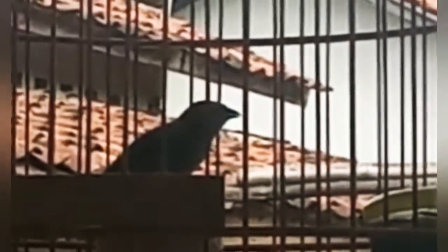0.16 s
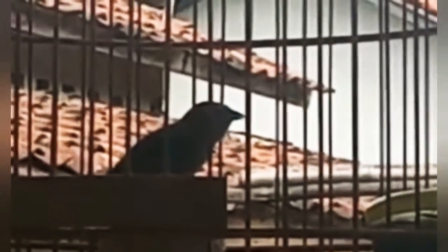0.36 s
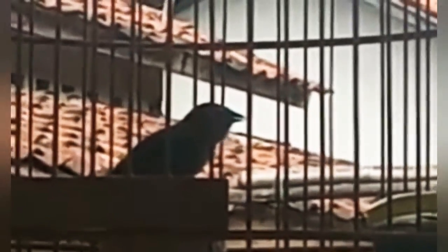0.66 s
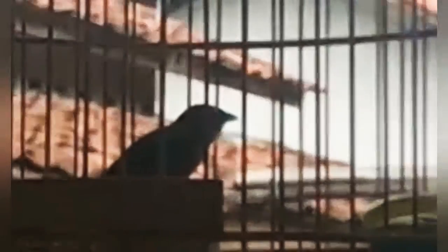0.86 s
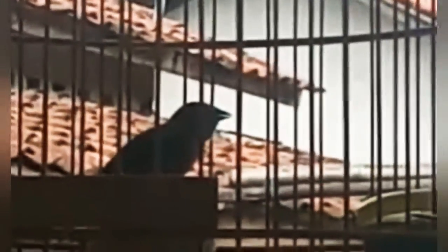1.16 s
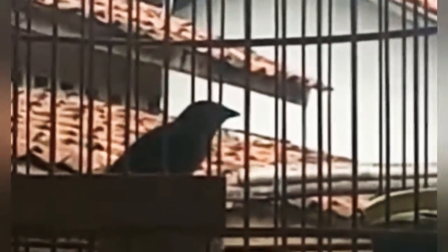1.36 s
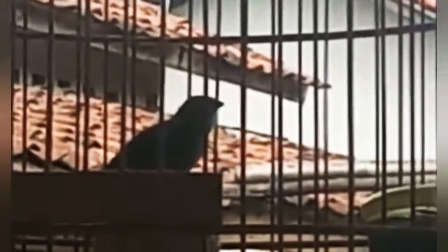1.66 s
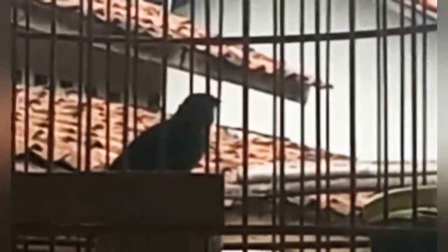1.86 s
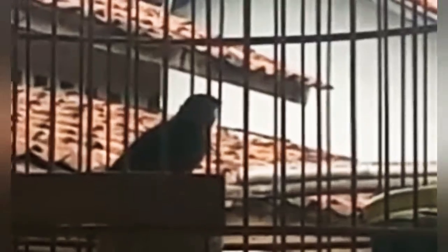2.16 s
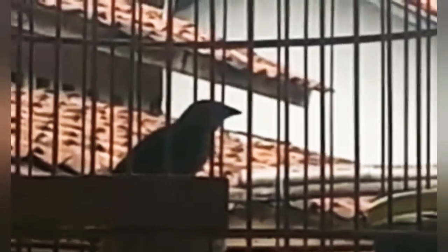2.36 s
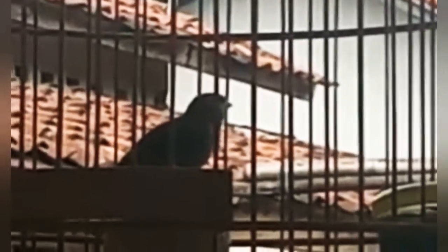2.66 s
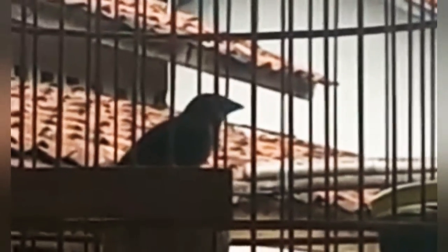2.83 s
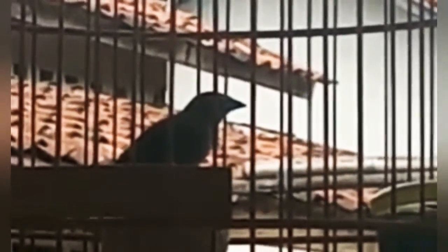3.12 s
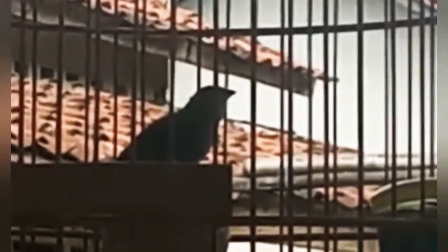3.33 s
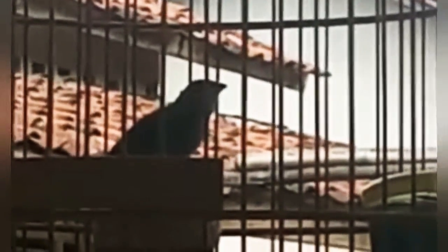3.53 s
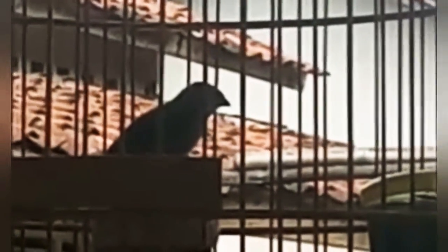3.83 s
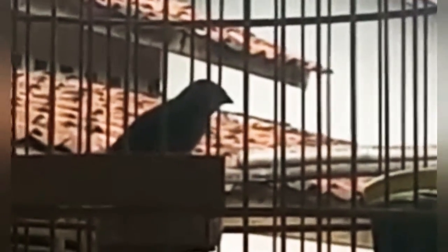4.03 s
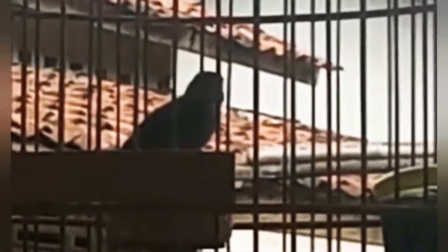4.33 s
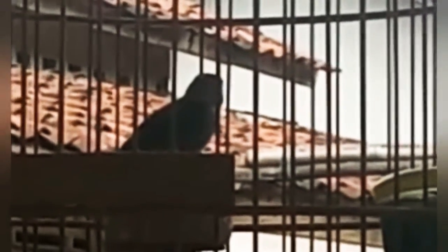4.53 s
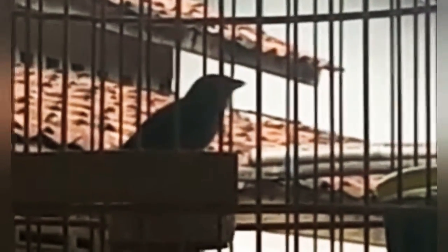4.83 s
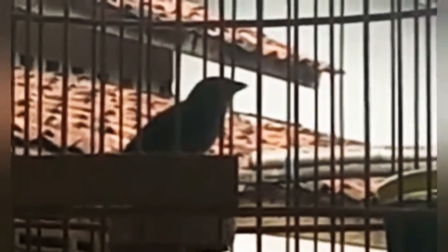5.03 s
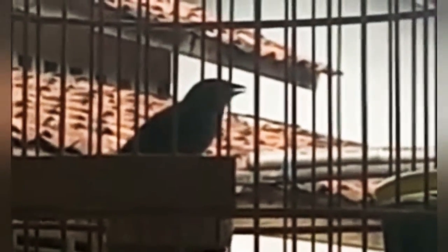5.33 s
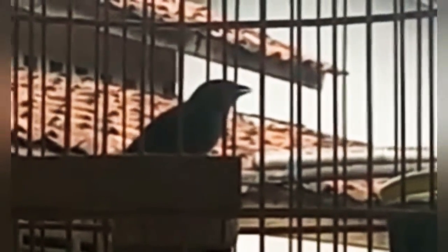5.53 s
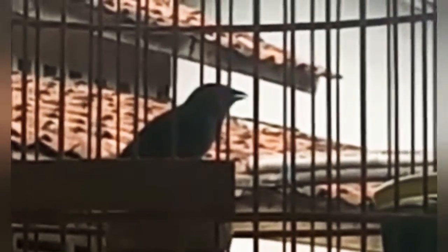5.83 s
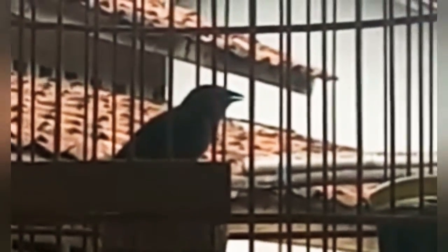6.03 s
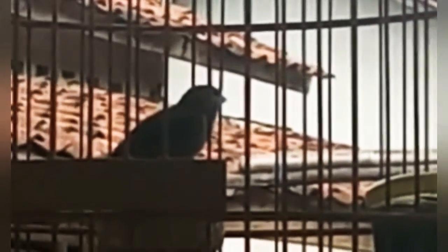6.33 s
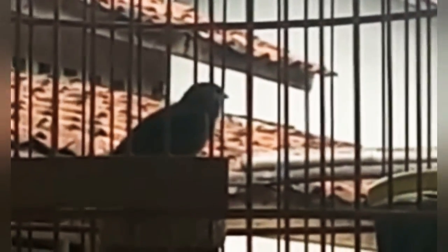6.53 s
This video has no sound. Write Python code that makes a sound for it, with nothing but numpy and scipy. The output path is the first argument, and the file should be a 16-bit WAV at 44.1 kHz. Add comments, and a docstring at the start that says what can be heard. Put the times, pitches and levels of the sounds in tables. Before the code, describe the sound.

A small caged bird opens with clear falling whistles as one dove gives stuttering hoots and a lower dove coos into a rolling purr. Quick creaky flicks, a short warble and sparse taps follow. The hoots return near the middle, then the low coo, and the songbird ends in rapid rising chirps and sharp buzzes. Echoing outdoor yard, close bird, faint traffic rumble.

```python
"""Falling slurs of a caged songbird, a dove's stuttering hoots and a lower dove's coo start at once.
The songbird goes on in a tiled yard: swept tones make its whistles, warble, flicks and buzzes.
The doves are nearly pure tones with breath noise; the lower one ends in a beating roll.
Faint birds and cries (soft tones), cage taps and scuffs (noise bursts) lie around them.
Random echoes stand for the walls, coloured noise for distant traffic and air."""
import sys
import numpy as np
from scipy import signal
from scipy.fft import rfft, irfft, next_fast_len
from scipy.io import wavfile
from scipy.ndimage import uniform_filter1d, map_coordinates

SR = 44100
rng = np.random.default_rng(int(sys.argv[2]) if len(sys.argv) > 2 else 0)


def transcribe(u):
    """Save the signal u as a 16-bit wav file named by the first command-line argument.

    u: samples, shape (n,) or (channels, n), limited to [-1, 1]; the rate is SR.
    q: integer samples, one column per channel.
    """
    v = np.clip(np.atleast_2d(u).T, -1, 1)
    q = np.round(v * 32767).astype(np.int16)
    wavfile.write(sys.argv[1], SR, q)


N = 294588


def amp(db):
    """Decibels to gain."""
    return 10 ** (np.asarray(db) / 20)


def unit(x):
    """Scale to rms 1."""
    return x / np.sqrt(np.mean(x ** 2) + 1e-20)


def seconds(length_s):
    """Time axis of one sound, in s."""
    return np.arange(int(length_s * SR)) / SR


def along(points, hz):
    """(f/Hz, value) points interpolated on a log frequency axis."""
    f, v = np.transpose(points)
    return np.interp(np.log(hz + 1), np.log(f + 1), v)


def wobble(rate_hz, size):
    """Smooth random curve with rate_hz knots per second."""
    knots = rng.standard_normal(int(size * rate_hz / SR) + 4)
    return map_coordinates(knots, [np.arange(size) * rate_hz / SR])


def filtered(x, response):
    """Apply a zero-phase gain response(f/Hz) to x."""
    m = next_fast_len(N + SR // 2)
    return irfft(rfft(x, m) * response(np.fft.rfftfreq(m, 1 / SR)), m)[:N]


def coloured(x, colour):
    """Filter x by (f/Hz, level/dB) points."""
    return filtered(x, lambda hz: amp(along(colour, hz)))


def noise(spectrum):
    """Coloured noise of rms 1."""
    return unit(coloured(rng.standard_normal(N), spectrum))


def patches(shape):
    """Smooth random field of rms 1 over frequency and time."""
    field = uniform_filter1d(rng.standard_normal(shape), size=3, axis=0)
    return unit(uniform_filter1d(field, size=6, axis=1))


def rasp(size, centre_hz, octaves):
    """Short band of noise of rms 1, Gaussian in log frequency."""
    hz = np.fft.rfftfreq(size, 1 / SR)
    band = np.exp(-(np.log2((hz + 1) / centre_hz) / octaves) ** 2)
    return unit(irfft(rfft(rng.standard_normal(size)) * band, size))


def add(track, s, sound):
    """Mix a sound into the track at s seconds; clip it to the track."""
    start = round(s * SR)
    part = sound[max(-start, 0):max(N - start, 0)]
    track[max(start, 0):][:len(part)] += part


def fade(t, attack, release):
    """Sine-squared opening and closing of a note; times in s."""
    return np.sin(np.pi / 2 * np.clip(np.minimum(t / attack, (t[-1] - t) / release), 0, 1)) ** 2


def gesture(length, start_hz, middle_hz, end_hz, db, place=.5, *, fade_db, edge):
    """Time/s, pitch/Hz and gain of a note: parabolic pitch, level peaking at place (0-1)."""
    t = seconds(length)
    u = t / length
    hz = np.polyval(np.polyfit([0, .5, 1], [start_hz, middle_hz, end_hz], 2), u)
    swell = amp(db - fade_db * np.abs(u - place) / max(place, 1 - place))
    gate = np.sin(np.pi / 2 * np.clip(np.minimum(t, length - t) / edge, 0, 1)) ** 2
    return t, hz, swell * gate


def voice(hz, gain, parts, jitter, jitter_rate):
    """Tone of (pitch multiple, level/dB) partials whose pitch and strength waver."""
    hz = hz * (1 + jitter * wobble(jitter_rate, len(hz)))
    gain = gain * amp(1.7 * wobble(jitter_rate / 2, len(hz)))
    phase = 2 * np.pi * np.cumsum(hz) / SR
    tone = sum(amp(db) * np.sin(k * phase) * (k * hz < SR / 2) for k, db in parts)
    return np.sqrt(2) * gain * tone


def phrase(notes, parts, fade_db, edge, jitter, jitter_rate):
    """Rows of (t/s, gesture columns) sung in one voice."""
    out = np.zeros(N)
    for s, *note in notes:
        t, hz, gain = gesture(*note, fade_db=fade_db, edge=edge)
        add(out, s, voice(hz, gain, parts, jitter, jitter_rate))
    return out


# distant traffic level: (t/s, level/dB)
TRAFFIC_LEVEL = [(0.0, -61.5), (0.4, -53.5), (0.65, -58), (1.41, -55), (1.86, -61), (3.42, -52), (4.3, -56),
                 (5.34, -51.5), (5.78, -58), (6.68, -56)]
# traffic spectrum shape: (f/Hz, relative level per Hz/dB)
RUMBLE_SPECTRUM = [(25, -29.5), (70, -3), (100, -4.5), (135, 2.5), (190, -13.5), (245, -26), (325, -9),
                   (410, -25), (480, -43), (700, -45), (2500, -67.5)]


def traffic():
    """Low noise, uneven over time and frequency, that swells and sinks."""
    z = signal.stft(noise(RUMBLE_SPECTRUM), nperseg=4096)[2]
    uneven = unit(signal.istft(z * amp(2.8 * patches(z.shape)))[1][:N])
    level_db = np.interp(np.arange(N) / SR, *np.transpose(TRAFFIC_LEVEL))
    return amp(level_db + 2.1 * wobble(9, N)) * uneven


def engine():
    """One brief low drone: a wavering sine."""
    note = (5.05, 0.718, 82.222, 84.28, 83.594, -47.983)  # t/s, length/s, three f/Hz, level/dB
    return phrase([note], [(1, 0)], fade_db=10, edge=0.092, jitter=0.019, jitter_rate=17)


# air hiss spectrum shape: (f/Hz, relative level per Hz/dB)
AIR_SPECTRUM = [(1400, 0.5), (1650, 4.5), (1900, -7), (4000, -5), (7500, -13), (10500, -10), (15500, -19.5)]


def air():
    """Faint steady coloured noise."""
    return amp(-81.5) * noise(AIR_SPECTRUM)


# yard decay: (f/Hz, t60/s)
YARD_T60 = [(1000, 0.51), (5000, 0.38), (12000, 0.22)]


def yard(x, wet_db, near_db):
    """Add early echoes off near walls and an uneven decaying tail, gained by energy."""
    hz, t, z = signal.stft(rng.standard_normal(SR), SR, nperseg=256)
    decay_db = -60 * t / along(YARD_T60, hz)[:, None]
    tail = signal.istft(z * amp(3.75 * patches(z.shape) + decay_db), SR, nperseg=256)[1]
    t = np.arange(len(tail)) / SR
    tail = tail * (1 - np.exp(-t / 0.01))
    hits = rng.random(len(t)) < 500 / SR  # 500 echoes per s on average
    walls = rng.standard_normal(len(t)) * hits * amp(-60 * t / 0.13)
    tail = amp(wet_db) * tail / np.linalg.norm(tail)
    walls = amp(near_db) * walls / np.linalg.norm(walls)
    return x + signal.fftconvolve(x, tail + walls)[:N]


# faint distant cries: (t/s, length/s, start, middle, end f/Hz before the 0.99 multiple, level/dB)
CRY_NOTES = [(1.97, .33, 222, 230, 198, -59.5), (1.95, .2, 1100, 930, 1000, -69.5),
             (1.15, 0.307, 700, 815, 720, -69)]


def cries():
    """Faint bending tones, a single partial each."""
    return phrase(CRY_NOTES, [(0.99, 0)], fade_db=7, edge=0.013, jitter=0.037, jitter_rate=120)


# one nasal peep: t/s, length/s, start, middle, end f/Hz, level/dB of an overtone at 0 dB
PEEP = (2.318, 0.17, 540, 562.5, 544, -58)
# peep overtone levels: (f/Hz, level/dB)
PEEP_COLOUR = [(550, 2), (1500, -19), (2300, -17), (6500, -17.5)]


def nasal_peep():
    """One note with 12 harmonics, strongest at the lowest."""
    parts = [(k, along(PEEP_COLOUR, k * PEEP[2])) for k in np.arange(1, 13)]
    return phrase([PEEP], parts, fade_db=6, edge=0.022, jitter=.026, jitter_rate=250)


def chatter(count=170):
    """Notes of faint short chips, random in time, pitch, bend and level."""
    chips = []
    for when, pitch, bend, level in rng.random((count, 4)):
        hz = 1900 * 3.2 ** pitch
        end_hz = hz * (0.79 + .25 * bend)
        chips.append((when * N / SR, .035, hz, hz, end_hz, -79.5 + 8 * level))
    return chips


# repeats of a farther bird's falling whistle: (t/s, level/dB)
FALLING_STARTS = [(.05, -61.5), (.94, -65), (2.97, -63), (4.089, -66)]
# that whistle: length/s, start, middle, end f/Hz before the 0.99 multiple
FALLING_SHAPE = (0.19, 4950, 4480, 3950)
# thin level whistles: (t/s, length/s, f/Hz before the 0.99 multiple, level/dB)
THIN_NOTES = [(0, 0.32, 6250, -69), (2.699, 0.11, 5840, -64), (3.021, 0.15, 6260, -69.5)]


def far_birds():
    """Falling whistles, thin level ones and stray chips, all single wavering partials."""
    falling = [(s, *FALLING_SHAPE, db) for s, db in FALLING_STARTS]
    thin = [(s, length, hz, hz, hz, db) for s, length, hz, db in THIN_NOTES]
    notes = falling + thin + chatter()
    return phrase(notes, [(0.99, 0.0014)], fade_db=7, edge=0.014, jitter=.016, jitter_rate=260)


# soft scuffs in the yard: (t/s, length/s, centre f/Hz, level/dB)
SCUFF_EVENTS = [(1.706, 0.067, 810, -68.5), (2.433, 0.095, 640, -64), (5.599, 0.13, 774, -60.5),
                (6.121, 0.059, 735, -68.5), (6.267, 0.055, 414, -67)]


def scuffs():
    """Soft puffs of dull band noise."""
    out = np.zeros(N)
    for s, length, centre_hz, db in SCUFF_EVENTS:
        size = int(length * SR)
        add(out, s, amp(db) * np.hanning(size) * rasp(size, centre_hz, octaves=0.86))
    return out


# taps of beak and feet on the cage: (t/s, ring level/dB, crack level/dB)
TAP_EVENTS = [(0.363, -77, -68), (.775, -78, -65), (1.252, -58.5, -56), (1.542, -48.5, -62.5),
              (1.993, -74, -47.5), (2.234, -65.5, -64.5), (3.639, -66, -63), (5.229, -61.5, -54.5),
              (6.276, -57, -58.5)]
# cage modes: (f/Hz, mean relative level/dB, t60/s)
CAGE_MODES = [(1273, -5, 0.044), (3210, -2.5, 0.087), (4104, -1.5, 0.043), (6060, -9, 0.079)]


def taps():
    """Short gritty scrapes that ring the decaying modes of the cage."""
    out, t = np.zeros(N), np.arange(SR // 4) / SR
    for s, ring_db, crack_db in TAP_EVENTS:
        ring = np.zeros(len(t))
        for hz, level_db, t60 in CAGE_MODES:
            mode_db = level_db + rng.normal(0, 2) - 60 * t / t60
            ring += amp(mode_db) * np.sin(2 * np.pi * hz * t)
        grit = unit(rasp(len(t), 8000, octaves=0.71) * amp(7.4 * wobble(1500, len(t))))
        crack = amp(-60 * t / 0.089) * grit
        onset = 1 - np.exp(-t / 0.00086)
        add(out, s, (amp(ring_db) * ring + amp(crack_db) * crack) * onset)
    return out


# phrase starts: t/s
HOOT_PHRASE_STARTS = [-.251, 2.672]
# arched hoots: (t in phrase/s, length/s, top f/Hz before the 0.99 multiple, level/dB, swoop time/s)
HOOTS = [(0, .165, 1212, -42, .021), (0.165, .045, 1093, -39.5, .005), (0.251, 0.044, 1064, -40, .007),
         (0.347, .054, 1073, -40.5, 0.0091), (0.462, .114, 1109, -43.5, 0.0117)]
# throat colour: (f/Hz, level/dB)
HIGH_THROAT = [(1170, 0.5), (1290, -14.5), (2000, -24.5)]
HOOT_SCOOP, HOOT_SAG = .33, .12  # shares of top pitch: low start, drop at end


def high_dove():
    """One phrase twice: sines swoop up, sag at the end and carry breath noise."""
    out = np.zeros(N)
    for s in HOOT_PHRASE_STARTS:
        for after, length, top_hz, db, swoop_s in HOOTS:
            t = seconds(length)
            scoop = HOOT_SCOOP * np.exp(-t / swoop_s)
            sag = HOOT_SAG * (t / length) ** 3.5
            gain = amp(db) * fade(t, attack=0.0048, release=.008)
            tone = voice(top_hz * (1 - scoop - sag), gain, [(0.99, 0)], jitter=.018, jitter_rate=197.7)
            breath = amp(-14) * gain * rasp(len(t), 902, octaves=0.29)
            add(out, s + after, tone + breath)
    return coloured(out, HIGH_THROAT)


ROLL_AFTER_S = .333
ROLL = (0.4833, 715.5, 659.5, 461.5, -34)  # length/s, start, middle, end f/Hz, level/dB
ROLL_RATE_HZ, ROLL_QUICKENS_HZ_PER_S = 24, 96.2
ROLL_SMOOTH_S, ROLL_MERGE_S = 0.3, .12  # beats merged by, duration of merging
ROLL_HOLD_S, ROLL_RELEASE_DB_PER_S = .35, 79


def roll(parts):
    """Long falling coo: the throat closes between beats, which quicken and merge."""
    t, hz, gain = gesture(*ROLL, place=0.12, fade_db=17, edge=0.0041)
    gain = gain * amp(-ROLL_RELEASE_DB_PER_S * np.maximum(t - ROLL_HOLD_S, 0))
    beat = 2 * np.pi * (ROLL_RATE_HZ * t + ROLL_QUICKENS_HZ_PER_S * t ** 2 / 2)
    depth = np.clip((ROLL_SMOOTH_S - t) / ROLL_MERGE_S, 0, 1)
    closing = depth * (1 + np.cos(beat)) / 2
    gain = gain * amp(-23 * closing ** 1.65)
    sagging_hz = hz * (1 - 0.066 * closing)
    tone = voice(sagging_hz, gain, parts, jitter=0.03, jitter_rate=180)
    return tone + amp(-15.5) * gain * rasp(len(t), 696, octaves=.5)


# calls: (t/s, level offset/dB)
LOW_CALLS = [(.03, -0.5), (4.422, -0.5)]
# rising coo, accent, pickup: (t in call/s, length/s, start f/Hz, end f/Hz, level/dB before call offset)
CALL_NOTES = [(0, 0.082, 528, 633, -41.5), (.069, 0.051, 698, 710, -33.5), (0.295, .04, 591, 638, -44)]
# one extra coo: t/s, length/s, start, middle, end f/Hz, level/dB
EXTRA_COO = (4.5, 0.1839, 540, 556, 538, -47)
# throat colour: (f/Hz, level/dB)
LOW_THROAT = [(750, 0), (1120, 3.5), (1260, -7), (2200, -12)]
COO_HUSK_DB = -65.5


def low_dove():
    """One call twice, husky coos then the roll; the second holds an extra coo."""
    parts = [(1, 0), (2, -24.5)]
    notes = []
    for s, call_db in LOW_CALLS:
        for after, length, low, high, db in CALL_NOTES:
            notes.append((s + after, length, low, (low + high) / 2, high, db + call_db, .6))
    notes.append(EXTRA_COO)
    out = phrase(notes, parts, fade_db=9, edge=0.0066, jitter=0.036, jitter_rate=200)
    for s, length, *_ in notes:
        t = seconds(length)
        husk = fade(t, attack=0.011, release=.03) * rasp(len(t), 850, octaves=.5)
        add(out, s, amp(COO_HUSK_DB) * husk)
    for s, call_db in LOW_CALLS:
        add(out, s + ROLL_AFTER_S, amp(call_db) * roll(parts))
    return coloured(out, LOW_THROAT)


# falling slurs: (t/s, length/s, top f/Hz, end f/Hz, share held at top 0-1, level/dB)
SLUR_NOTES = [(.008, 0.063, 3380, 2645, 0.54, -46), (0.24, 0.12, 3668, 1950, 0.03, -43.5),
              (0.417, 0.1, 3733, 1904, 0.3, -45), (.613, 0.088, 3394, 1925, 0.08, -44.5),
              (0.782, 0.083, 3700, 2100, 0.1, -44), (2.632, .022, 5010, 3900, 0.16, -56.5),
              (2.65, 0.057, 3950, 3080, 0.07, -50), (4.248, 0.05, 4600, 3990, 0.24, -45),
              (4.313, 0.038, 4040, 2823, 0, -46.5), (4.42, 0.05, 4060, 3070, 0.3, -48),
              (4.647, 0.033, 7090, 5290, 0, -40), (4.682, 0.031, 5940, 4460, 0.04, -44),
              (5.748, 0.011, 6780, 6400, 0, -43), (6.083, .024, 6460, 5840, 0.07, -39.5)]
SLUR_ATTACK_SHARE, SLUR_FADE_DB_PER_OCTAVE = 0.18, 16


def slurs(parts):
    """Tones swell from the top pitch, slide down at even speed and weaken with pitch."""
    out = np.zeros(N)
    for s, length, top_hz, end_hz, held, db in SLUR_NOTES:
        t = seconds(length)
        hz = np.interp(t, [held * length, length], [top_hz, end_hz])
        gain = amp(db - SLUR_FADE_DB_PER_OCTAVE * np.log2(top_hz / hz))
        gain = gain * fade(t, SLUR_ATTACK_SHARE * length, release=0.003)
        add(out, s, voice(hz, gain, parts, jitter=0.019, jitter_rate=600))
    return out


# rising whistles: (t/s, length/s, start f/Hz, end f/Hz, upward bow/Hz, level/dB)
RISE_NOTES = [(4.943, 0.032, 2610, 3870, 47, -46.5), (5.147, .1, 2796, 3603, 216, -47),
              (5.392, 0.054, 3010, 3780, -100, -46.5), (5.641, 0.033, 2870, 4890, -300, -43.5),
              (5.819, 0.043, 2780, 4120, -170, -47.5), (5.946, 0.037, 3136, 3570, 155, -42),
              (6.139, 0.022, 3050, 3560, 64, -44), (6.3, 0.021, 3600, 4210, -65, -46.5),
              (6.424, 0.021, 3100, 3885, 217, -43)]
RISE_PEAK, RISE_FADE_DB = 0.71, 13  # place of peak 0-1, drop towards the farther end
RUN_S, RUN_STEP_S, RUN_NOTE_S, RUN_DB = 4.789, .0505, .036, -46.5
RUN_START_HZ, RUN_END_HZ = 2780, 3370


def rises(parts, count=3):
    """Upward glides: a quick even run into a steep one, then singles between buzzes."""
    run = [(RUN_S + k * RUN_STEP_S, RUN_NOTE_S, RUN_START_HZ, RUN_END_HZ, 0, RUN_DB) for k in range(count)]
    notes = []
    for s, length, low, high, bow, db in run + RISE_NOTES:
        notes.append((s, length, low, (low + high) / 2 + bow, high, db, RISE_PEAK))
    return phrase(notes, parts, fade_db=RISE_FADE_DB, edge=0.0017, jitter=0.016, jitter_rate=700)


# one warble: (t/s, trough f/Hz, level/dB)
WARBLE_PATH = [(3.476, 3955, -47.5), (3.515, 3974, -54.5), (3.575, 2717, -55), (3.72, 2665, -57.5)]
WARBLE_CREST_S, WARBLE_RATE_HZ, WARBLE_LEAP_HZ = 3.483, 22.8, 1050  # first crest, crest rate, height


def warble(parts):
    """Sinking tone whose pitch leaps up in narrow, even crests."""
    times, trough_hz, db = np.transpose(WARBLE_PATH)
    t = seconds(times[-1] - times[0])
    s = times[0] + t
    crest = np.cos(np.pi * WARBLE_RATE_HZ * (s - WARBLE_CREST_S)) ** 4
    hz = np.interp(s, times, trough_hz) + WARBLE_LEAP_HZ * crest
    gain = amp(np.interp(s, times, db)) * fade(t, 0.0035, .006)
    out = np.zeros(N)
    add(out, times[0], voice(hz, gain, parts, jitter=0.019, jitter_rate=730))
    return out


# upward flicks: (centre t/s, top f/Hz, level/dB, creak level/dB)
FLICK_NOTES = [(1.078, 3615, -50.5, -53.5), (1.13, 3794, -48, -51.5), (1.182, 4510, -50.5, -48.5),
               (1.237, 3590, -48.5, -58), (1.619, 3600, -62, -58), (1.669, 4070, -54, -56.5),
               (2.629, 5100, -54.5, -59.5), (2.809, 3777, -49, -55.5), (4.254, 4540, -57.5, -64),
               (4.424, 4630, -55, -54.5), (6.658, 3500, -58, -57)]


def flicks(parts):
    """Tones shoot up and round off at the top, each inside a grainy noise creak."""
    out = np.zeros(N)
    for s, top_hz, db, creak_db in FLICK_NOTES:
        t, hz, gain = gesture(0.02, 0.49 * top_hz, .9 * top_hz, top_hz, db, fade_db=12.5, edge=0.0027)
        add(out, s - t[-1] / 2, voice(hz, gain, parts, jitter=0.03, jitter_rate=750))
        size = int(0.052 * SR)
        creak = unit(rasp(size, 2955, octaves=0.52) * amp(3.8 * wobble(400, size)))
        add(out, s - size / SR / 2, amp(creak_db) * np.hanning(size) * creak)
    return out


# buzzes: (t/s, length/s, start f/Hz, end f/Hz, level/dB, sweep rate/Hz, sweep span/Hz: + up, - down)
BUZZ_NOTES = [(1.99, .03, 5900, 4640, -39.5, 289, -2200), (5.079, 0.029, 5600, 4860, -44, 165, 2602),
              (5.103, .024, 5800, 6080, -40.5, 169, 1510), (5.221, .028, 6200, 4810, -41.5, 227, -2400),
              (5.32, .055, 5700, 6250, -38, 135, 2200), (5.57, 0.039, 5800, 5450, -44, 162, 1998),
              (5.756, .026, 6400, 5760, -34, 213, -1200), (6.102, .03, 5850, 5460, -39.5, 229, -1600),
              (6.237, 0.059, 5700, 5700, -43, 140.6, -2600), (6.386, 0.02, 6400, 4730, -40.5, 192, -2000)]
BUZZ_HISS_DB = -29.5  # re tone level
BUZZ_PEAK, BUZZ_UNEVEN_CYCLES = 0.48, .16  # place of peak 0-1, sweep scatter


def buzzes(parts):
    """Uneven trains of tiny whistles sweeping one way, each in a soft puff of hiss."""
    out = np.zeros(N)
    for s, length, start_hz, end_hz, db, rate, sweep_hz in BUZZ_NOTES:
        middle_hz = (start_hz + end_hz) / 2
        t, hz, gain = gesture(length, start_hz, middle_hz, end_hz, db, BUZZ_PEAK, fade_db=5.5, edge=0.0012)
        cycle = (rate * t + BUZZ_UNEVEN_CYCLES * wobble(rate, len(t))) % 1
        swept_hz = hz + sweep_hz * (cycle - .5)
        pulsed = gain * np.abs(np.sin(np.pi * cycle))
        add(out, s, voice(swept_hz, pulsed, parts, jitter=0.024, jitter_rate=1300))
        size = 2 * len(t)
        hiss = np.hanning(size) * rasp(size, 11000, octaves=.6)
        add(out, s - length / 2, amp(db + BUZZ_HISS_DB) * hiss)
    return out


# near bird's colour: (f/Hz, level/dB)
BEAK_COLOUR = [(1950, -0.5), (2450, -9), (3300, 0.5), (6400, 0), (7600, -3.5), (9000, 2), (11700, -2.5),
               (12800, -16.5)]


def songbird():
    """Nearly pure tones with weak harmonics, all filtered by one beak."""
    parts = [(1, 0), (2, -27.5), (3, -38.5)]
    song = slurs(parts) + rises(parts) + warble(parts) + flicks(parts) + buzzes(parts)
    return coloured(song, BEAK_COLOUR)


def scene():
    """Mix: near bird drier, far ones with more echo than direct sound."""
    background = traffic() + engine() + air()
    distant = amp(-3.0) * yard(far_birds() + cries() + nasal_peep(), wet_db=-1.9, near_db=-3.0)
    high = amp(-2.0) * yard(high_dove(), wet_db=-8.0, near_db=-5)
    low = amp(-0.54) * yard(low_dove(), wet_db=-11.0, near_db=-12)
    near = amp(-1.5) * yard(songbird() + taps() + scuffs(), wet_db=-8.5, near_db=-3.5)
    return (background + distant + high + low + near)[None]


TOP_HZ = 15800


def record(dry):
    """Band limit: nothing is kept from TOP_HZ up."""
    return filtered(dry[0], lambda hz: hz < TOP_HZ)[None]


dry = scene()
out = record(dry)
transcribe(out)
```